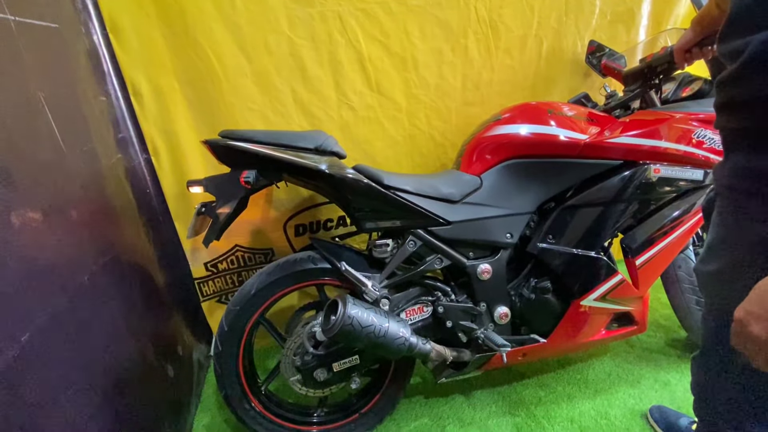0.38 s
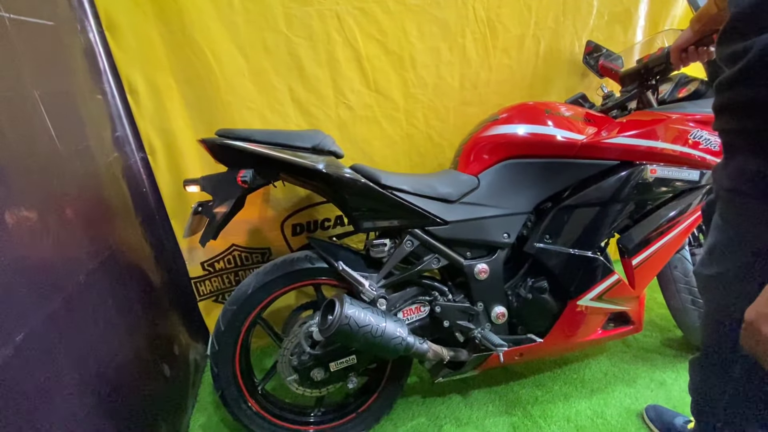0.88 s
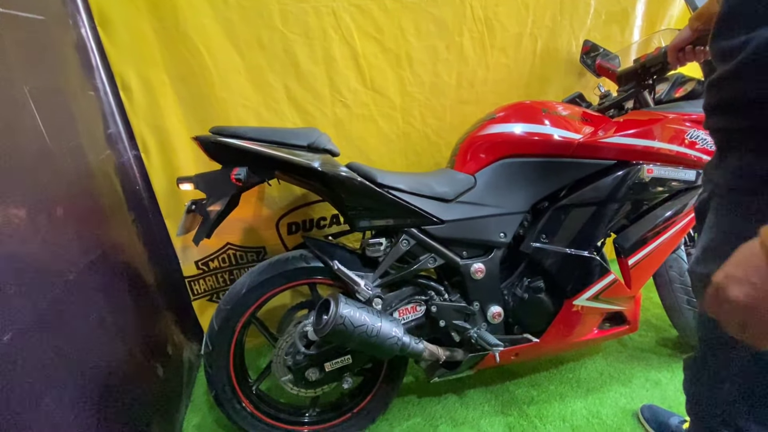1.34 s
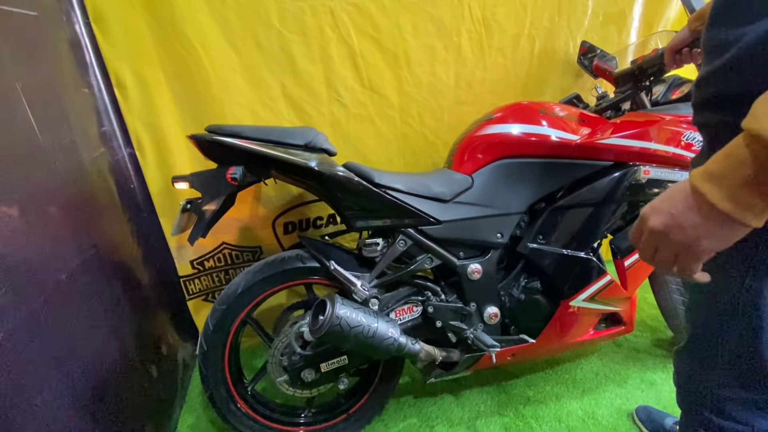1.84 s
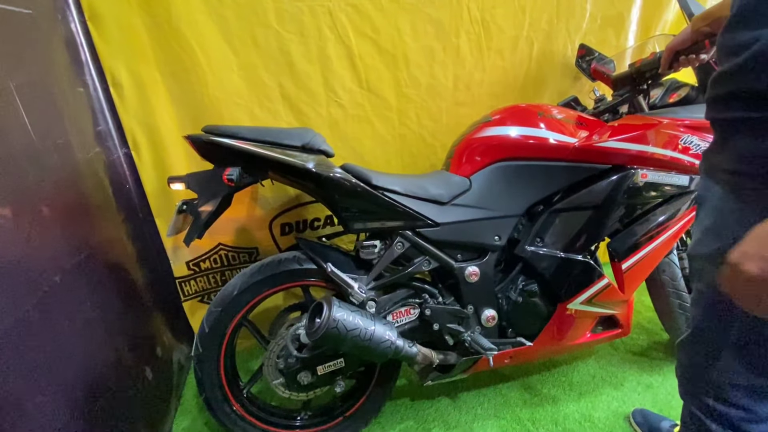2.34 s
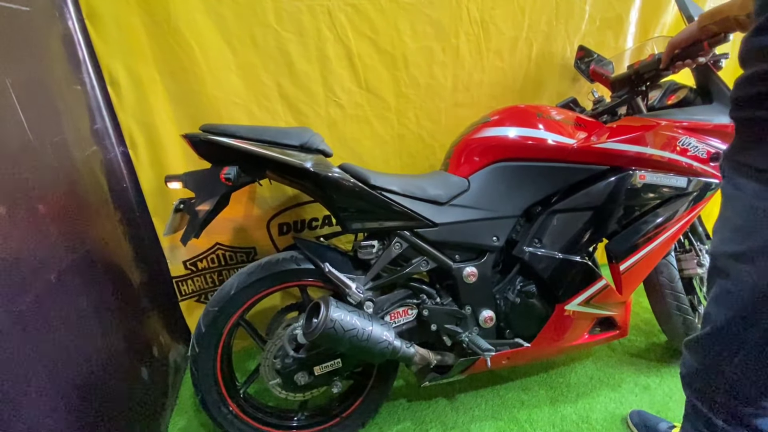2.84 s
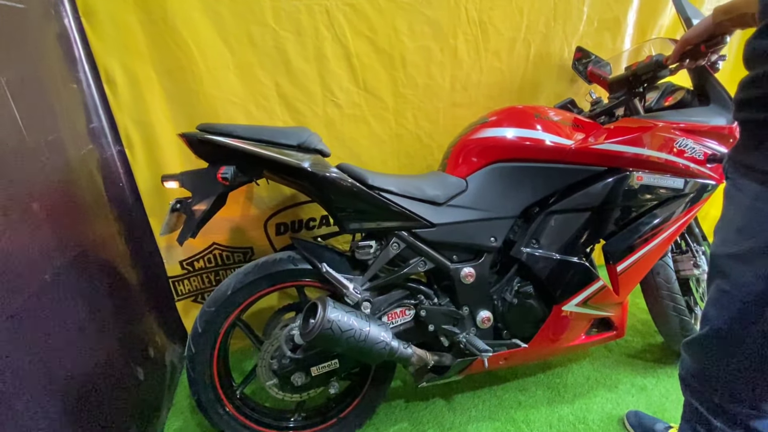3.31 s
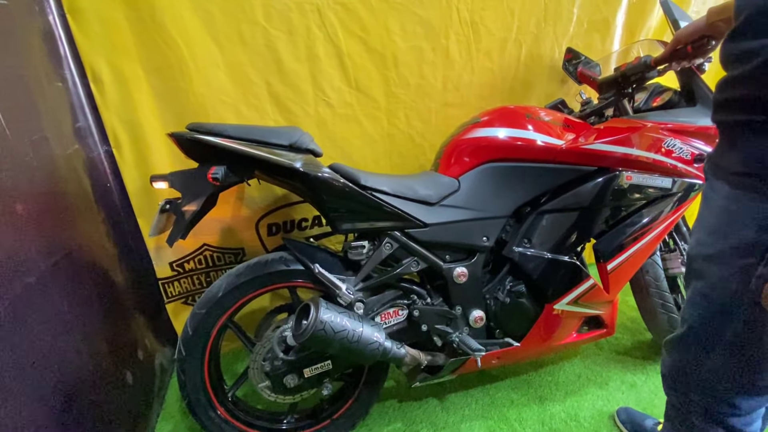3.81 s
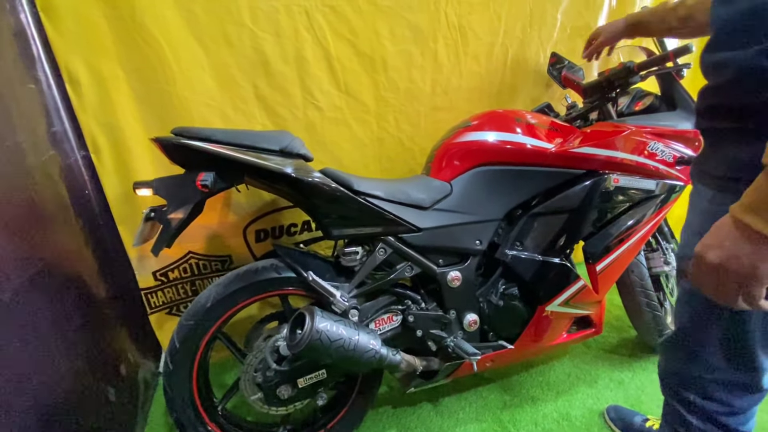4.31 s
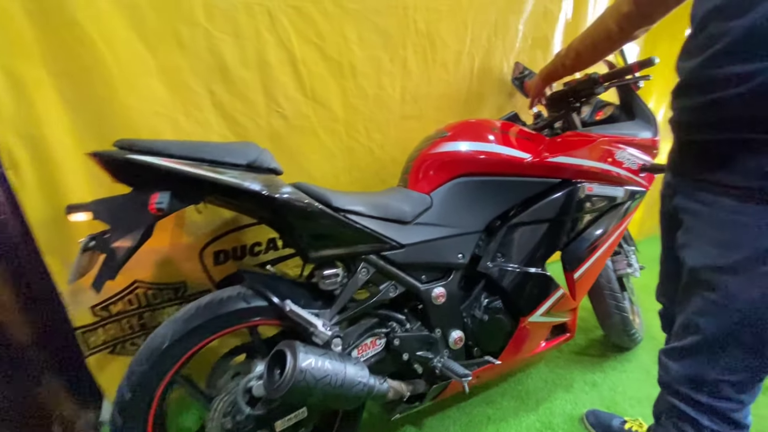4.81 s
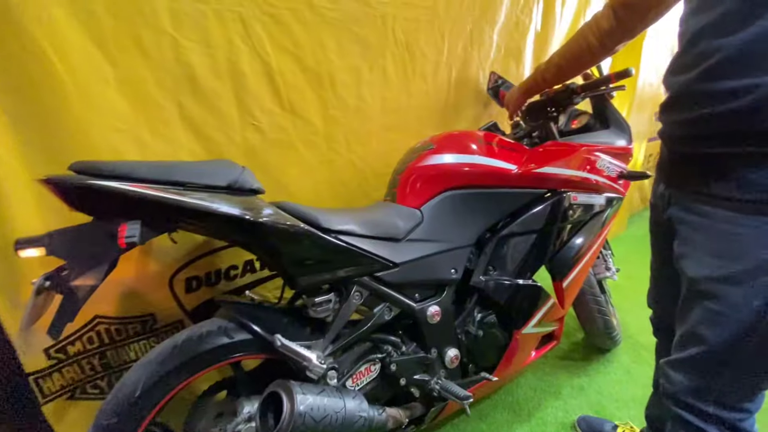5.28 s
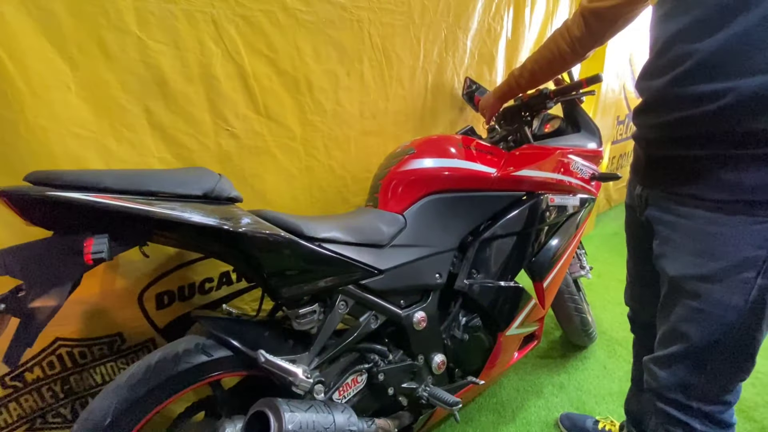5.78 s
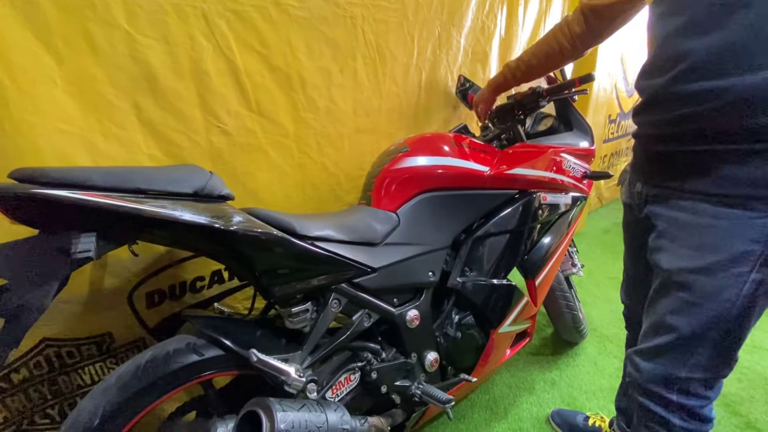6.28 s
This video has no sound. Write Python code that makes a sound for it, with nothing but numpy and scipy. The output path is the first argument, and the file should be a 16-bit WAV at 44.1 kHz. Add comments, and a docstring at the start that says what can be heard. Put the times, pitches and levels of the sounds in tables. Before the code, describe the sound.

In a small hard room, a motorbike's revs drop quickly into an uneven low idle with light valve rattle, before the engine is cut and a key clicks.

```python
"""A small four-stroke twin falls from a rev to a lumpy idle in a small hard room, then the ignition is cut.
Two firings a quarter cycle apart boom in the lowest room modes, throb in the silencer, bark in the pipe
and spit at the outlet. Noise through the engine cases makes the valve rattle; unburnt fuel pops, a few
firings start hard and a key clicks with a rattling tail, as short bursts ringing a body. Each microphone
gets its own wall answer and port."""
import sys
import numpy as np
from scipy import signal
from scipy.fft import rfft, irfft, next_fast_len
from scipy.io import wavfile
from scipy.ndimage import uniform_filter1d

SR = 44100
rng = np.random.default_rng(int(sys.argv[2]) if len(sys.argv) > 2 else 0)


def voltage_ratio(level):
    """Linear amplitude factor for a level in decibels (scalar or array-like)."""
    return 10 ** (np.asarray(level, float) / 20)


def master(y):
    """Save y as 16-bit WAV."""
    cut = np.clip(np.atleast_2d(y).T, -1, 1)
    pcm = np.round(cut * 32767)  # scale
    wavfile.write(sys.argv[1], SR, pcm.astype(np.int16))


N = 282240

# faint room air spectrum: freq_hz, relative_db
AIR = [(88, -26.5), (150, 6.5), (205, -8), (604, -50), (888, -25), (1030, -25), (2100, -40), (12000, -52.5),
       (15600, -99), (22000, -120)]
AIR_DB = -53
# reverberation: freq_hz, t60_s
REVERB = [(100, .7), (1000, .24), (4000, .075), (10000, .045)]
# wall sound against direct: freq_hz, level_db
WET = [(60, -32), (110, -21), (200, -15), (350, -13), (600, -19), (1100, -8), (2000, -6), (3500, 1),
       (6000, 6), (8000, 4), (10500, 1)]
# port gain, right and left microphone: freq_hz, gain_db
RIGHT_PORT = [(60, 4), (160, 8), (300, 4.5), (600, 12), (1000, 2.5), (2000, 9), (4500, -7.5), (10000, -10)]
LEFT_PORT = [(60, -4), (160, -9.5), (250, -6), (410, 4), (660, 11), (1060, 0.5), (2000, 4), (4500, -4.5),
             (10000, -10), (12300, -10.5)]
# phase lead of the left channel: freq_hz, lead_rad
LEFT_LEAD = [(0, -0.5), (200, -1.33), (300, -2.5), (520, -3.4), (1120, -3.5), (1640, -1.6), (2500, -.2),
             (2930, 2.5), (3700, 4.8), (4480, 6.7), (5000, 9.1), (5770, 10), (6200, 12.3), (6890, 12.7),
             (8500, 13)]
# microphones walk nearer to the cases: time_s, distance_m
DISTANCE = [(0, 1.63), (3.6, 1.72), (4.9, 1.31), (5.7, 1.22)]

# key click, a small one before it and its rattling tail: start_s, level_db
KEY = [(6.2854, -54.5), (6.3244, -41), (6.363, -52), (6.383, -49)]
# lock body: mode_hz, width_hz, level_db
LOCK = [(1300, 260, 11), (1810, 400, 10), (2530, 670, 6), (3100, 700, 9), (4400, 1500, 4),
        (7300, 3000, -18)]
# hard onsets of single firings: start_s, level_db
HARD_ONSETS = [(3.135, -40), (3.669, -41), (5.882, -39)]
# body of those firing onsets: mode_hz, width_hz, level_db
ONSET_RING = [(900, 590, 13), (2000, 900, -8), (4300, 1800, -12), (10000, 3000, -24)]
# afterfire pop: start_s, level_db before the silencer
POPS = [(.2745, -8.5), (.2825, -23)]
# pop body: mode_hz, width_hz, level_db
POP_RING = [(230, 120, 4), (600, 500, 9), (1060, 400, 12), (1450, 400, 11), (2150, 500, 8), (2650, 700, 3),
            (3700, 900, -9), (10100, 2300, -20)]
# silencer dulls the pop: mode_hz, width_hz, level_db
MUFFLE = [(1500, 2600, 1.5)]

# speed until the cut: time_s, cycles_per_s
SPEED = [(0.0, 61.8), (0.14, 55.04), (0.34, 46.42), (0.53, 41.4), (0.93, 34.5), (1.03, 33.2), (1.19, 30.4),
         (1.52, 26.7), (1.82, 23.6), (2.07, 20.4), (2.3, 17.5), (2.46, 16.54), (2.86, 15.96), (3.18, 15.87),
         (3.74, 14.82), (4.2, 14.32), (4.46, 14.72), (4.74, 13.9), (5.02, 14.66), (5.54, 13.9),
         (5.9, 14.43)]
# exhaust bands before the fade: time_s, boom_db, throb_db, bark_db
LEVELS = [(0.0, -26.5, -21.5, -28.5), (0.12, -21.5, -19.5, -35.5), (0.23, -37.5, -22.5, -34.5),
          (0.29, -27.5, -15.5, -37.5), (0.35, -23.5, -33.5, -37), (0.42, -24, -34.5, -40),
          (0.58, -38.5, -30.5, -36.5), (1.0, -34.5, -31, -36.5), (1.4, -32.5, -27.5, -39),
          (1.6, -26.5, -29.5, -43.5), (1.75, -26.5, -28, -40), (2.2, -24.5, -33, -44),
          (2.4, -21.5, -33, -42), (2.7, -17.5, -36.5, -45), (2.9, -17, -30, -48.5),
          (3.1, -21, -28.5, -48.5), (3.2, -22.5, -28.5, -48), (3.33, -23.5, -31, -45.5),
          (3.5, -36.5, -31, -44.5), (3.7, -26.5, -30.5, -49), (4.1, -22, -31.5, -49),
          (4.5, -23.5, -30.5, -49), (4.9, -20, -31.5, -43), (5.3, -19.5, -30, -43),
          (5.9, -19.5, -32.5, -42.5)]
# fade after the cut: boom_db_per_s, throb_db_per_s, bark_db_per_s
FADE_DB_PER_S = [21, 98.5, 143]
# uneven burning: time_s, amount_0_to_1
ROUGH = [(0, .12), (.25, .35), (.5, .2), (1.3, .3), (1.9, .5), (2.3, .35), (2.6, .08), (5.8, .14)]
# cycles burning unevenly on the overrun: time_s, against_neighbours_db
STRONG = [(.75, 3.5), (.786, 1.5), (.831, 3.5), (.894, 4.5), (.949, 4.5), (.985, 3.5), (1.098, 2), (1.3, 2),
          (1.338, 3), (1.374, 4.5), (1.412, 3), (1.445, 2), (1.484, -0.5), (1.518, 5), (1.556, 2),
          (1.592, 4), (1.636, 0), (1.674, 3), (1.727, 0.5), (1.84, -2), (1.891, -6), (1.931, 3.5),
          (2.119, 5), (2.173, 1.5), (2.227, 2)]
# idle strokes pushing air on a shut throttle, against a firing: time_s, boom_size_0_to_1, throb_size_0_to_1
PUMP = [(0, 0, 0.66), (.3, 0.1, 0.15), (.5, 0.2, 0.21), (1.2, 0, 0.39), (1.45, 0.43, 0.12),
        (1.7, 0.67, 0.24), (2.0, 0, 0.1), (2.25, 0.4, 0.16), (2.45, 0.05, 0.069), (3.5, 0.3, 0.021),
        (5.9, 0.07, 0.08)]
# lowest room modes: mode_hz, width_hz, level_db
BOOM = [(56.3, 2.82, 8), (62.4, 10.4, 4), (82.75, 6, 9.5), (108.5, 12.1, -3.5)]
# silencer resonances: mode_hz, width_hz, level_db
SILENCER = [(110.93, 5.4, -5), (122.8, 5.2, -3), (138, 2.6, -1.5), (172.9, 5.6, -9.5), (189.9, 21, -9.5),
            (205.8, 13, -5), (236.5, 8.3, -6), (234.5, 71, -7.5), (256.3, 5.5, 7.5)]
# exhaust pipe resonances: hot_mode_hz, cool_width_hz, cool_level_db, hot_level_db
PIPE = [(357.7, 8.9, 4, -6), (405.8, 29, 6, -4.5), (447, 30, -5, 2.5), (561, 46, 6, 2.5), (672, 24, -3, 0),
        (827.6, 43, 7.5, 6), (860, 70, 1.5, 1.5), (935, 87, -9, -4.5)]
# outlet rasp: mode_hz, width_hz, level_db
RASP = [(1038, 35, 6.5), (1350, 73, -18), (1870, 1700, -14)]
# engine case spectrum: freq_hz, relative_db
CASES = [(680, -8.5), (1150, -11.5), (1280, -12.5), (1570, -13.5), (1660, -10.5), (1840, -10.5),
         (2440, -14.5), (3040, -13.5), (3600, -14.5), (4200, -13), (4970, -11.5), (5500, -18.5),
         (5800, -14), (6150, -27), (6450, -16.5), (7600, -24.5), (8500, -20.5), (11000, -23), (18700, -120)]
# outlet jet spectrum: freq_hz, relative_db
JET = [(4590, -55), (7800, -32.5), (9290, -3), (10100, 8), (12200, 1.5), (12900, -22.5), (14800, -7.5),
       (15800, -21), (22000, -120)]
# level against speed: idle_db, gain_at_rev_db, steepness, loss_per_halving_under_idle_db
RATTLE_LAW = (-52.5, 19.5, 1.24, 12)
JET_LAW = (-60.5, 15, 3.5, 1.5)

IDLE_HZ, REV_HZ = 14.5, 60  # engine cycles at which the level laws are given
START_CYCLES, TWIN_CYCLES = .22, .25  # phase at 0 s, gap between the two firings
SHORTER_HEADER_S = .0007  # second cylinder arrives earlier
CUT_S, COAST_HZ_PER_S = 5.9, 27  # ignition off, crank slowing after it
COAST_DB, COAST_LOSS_DB_PER_S = -7, 40  # only pumped air after the cut, weakening
JET_CUT_DB = -14  # jet without burnt gas
BOOM_LEAD_S = .006  # boom starts at the valves, before gas has passed the silencer
BAFFLE_HZ = 309  # baffles stop the throb above this
COOL_HZ_RATIO, HOT_WIDTH_RATIO = 0.96, 1.5  # cool gas rings lower, fast hot gas rings wider


def unit(x):
    """Scale to rms 1."""
    return x / np.sqrt(np.mean(x ** 2) + 1e-20)


def even(x, span_s):
    """Divide by a running rms, smoothed twice over span_s."""
    size = int(span_s * SR)
    power = uniform_filter1d(x ** 2, size, mode="mirror")
    power = uniform_filter1d(power, size, mode="mirror")
    return x / np.sqrt(np.abs(power) + 1e-12)


def along(points, hz):
    """Interpolate (Hz, value) points on a log axis."""
    f, v = np.transpose(points)
    return np.interp(np.log(hz + 1), np.log(f + 1), v)


def curves(rows):
    """Interpolate each column after the time to one value per sample."""
    s, *cols = np.transpose(rows)
    return [np.interp(np.arange(N) / SR, s, c) for c in cols]


def filtered(x, response):
    """Apply a complex response of frequency."""
    m = next_fast_len(N + SR)
    return irfft(rfft(x, m) * response(np.fft.rfftfreq(m, 1 / SR)), m)[..., :N]


def resonant(x, modes, flip=-1):
    """Sum causal resonances, mode k weighted flip**k: 1 strikes in step, -1 alternates and swells."""
    def response(f):
        total = 0
        for k, (centre, width, db) in enumerate(modes):
            damping = 1j * f * width
            total = total + flip ** k * voltage_ratio(db) * damping / (centre * centre - f * f + damping)
        return total
    return filtered(x, response)


def softened(x, hz):
    """Three one-pole lowpasses: gas slugs have no sharp edge."""
    return filtered(x, lambda f: 1 / (1 + 1j * f / hz) ** 3)


def noise(spectrum):
    """Coloured noise of rms 1."""
    return unit(filtered(rng.standard_normal(N), lambda hz: voltage_ratio(along(spectrum, hz))))


def room_air():
    """Faint steady noise, independent in each channel."""
    return voltage_ratio(AIR_DB) * np.array([noise(AIR), noise(AIR)])


def room(x, count=40):
    """Diffuse wall answer per microphone, decaying noise crossfaded to new draws as they are carried about."""
    step = N // count
    out = np.zeros((2, N + 2 * SR))
    padded = np.pad(x, (step, 2 * step))
    window = np.sin(np.pi * np.arange(2 * step) / (2 * step)) ** 2
    for k in range(count + 1):
        hz, t, z = signal.stft(rng.standard_normal((2, SR // 2)), SR, nperseg=256)
        decay = voltage_ratio(-60 * t / along(REVERB, hz)[:, None])
        tail = signal.istft(z * decay, SR, nperseg=256)[1]
        tail = tail / np.linalg.norm(tail[0])
        piece = padded[k * step:][:2 * step] * window
        answer = signal.fftconvolve(piece[None], tail, axes=1)
        out[:, k * step + 250:][:, :answer.shape[1]] += answer  # 250 samples: walls answer late
    return filtered(out[:, step:][:, :N], lambda f: voltage_ratio(along(WET, f)))


def bursts(events, modes, decay_s, crack):
    """A one-sample crack and a decaying noise burst ring a body, scaled to the event's peak."""
    out, t = np.zeros(N + SR), np.arange(SR // 10) / SR
    for s, db in events:
        push = np.exp(-t / decay_s) * rng.standard_normal(len(t)) + crack * (t == 0)
        ring = resonant(np.pad(push, (0, N - len(t))), modes, flip=1)[:SR // 5]
        out[round(s * SR):][:len(ring)] += voltage_ratio(db) * ring / np.abs(ring).max()
    return out[:N]


def key_click():
    """A small click, the main one and its rattling tail ring the lock."""
    return bursts(KEY, LOCK, decay_s=0.023, crack=3.4)


def hard_onsets():
    """A few firings start hard: a crack and a short burst, ringing mostly low."""
    return bursts(HARD_ONSETS, ONSET_RING, decay_s=0.0067, crack=1.7)


def afterfire():
    """Unburnt fuel pops; the silencer dulls it."""
    return resonant(bursts(POPS, POP_RING, decay_s=0.0025, crack=4.8), MUFFLE)


def coasting_db(at):
    """Loss of a stroke at sample `at` once nothing burns."""
    return (at > CUT_S * SR) * (COAST_DB - COAST_LOSS_DB_PER_S * (at / SR - CUT_S))


def with_speed(speed, idle_db, rev_db, steepness, halving_db):
    """Level climbs with speed above idle and sinks as the crank coasts."""
    above = np.clip((speed - IDLE_HZ) / (REV_HZ - IDLE_HZ), 0, None)
    return idle_db + rev_db * above ** steepness + halving_db * np.log2(np.clip(speed / IDLE_HZ, None, 1))


def pumping(cycle):
    """Air pushes of the two strokes between the firings, as boom and throb get them."""
    out = np.zeros(N)
    strokes = np.arange(int(cycle[-1]))[:, None] + TWIN_CYCLES * np.arange(2, 4)
    at = np.interp(strokes, cycle, np.arange(N)).astype(int).ravel()
    np.add.at(out, at, voltage_ratio(coasting_db(at)))
    return out * np.clip(curves(PUMP), 0, 1)


def firings(cycle, spread_db, jitter_cycles):
    """One impulse per blowdown, a row per cylinder; lean running scatters size and timing."""
    out, rough = np.zeros((2, N)), curves(ROUGH)[0]
    turns = np.arange(int(cycle[-1]))
    luck = rng.standard_normal((len(turns), 4))
    extra_db = np.zeros(len(turns))
    for s, db in STRONG:
        extra_db[round(cycle[round(s * SR)])] = db
    for k in range(2):
        due = turns + k * TWIN_CYCLES
        at = np.interp(due, cycle, np.arange(N)).astype(int)
        scattered = due + jitter_cycles * rough[at] * luck[:, k + 2]
        arrival = np.interp(scattered, cycle, np.arange(N)) - k * SHORTER_HEADER_S * SR
        size_db = extra_db + spread_db * rough[at] * luck[:, k] + coasting_db(at)
        np.add.at(out[k], np.maximum(arrival, 0).astype(int), voltage_ratio(size_db))
    return out


def puffs(pulses, decay_s):
    """Gas flow after each blowdown: sudden start, exponential end."""
    return unit(signal.lfilter([1], [1, -np.exp(-1 / (decay_s * SR))], pulses))


def outlet_jet(pulses, flow):
    """Broadband hiss swelling with each gas puff."""
    spit = softened(puffs(pulses, decay_s=0.002), hz=300)
    return even(noise(JET) * (.5 + 1.2 * spit + 0.81 * flow), span_s=0.086)


def outlet_rasp(turbulence):
    """Turbulent gas rings the outlet."""
    rasp = resonant(turbulence + rng.standard_normal(N), RASP)
    return unit(resonant(rasp, [(1520, 1300, 0)]))


def valve_rattle(flow, turbulence, bright):
    """Case noise swells with the firings; outlet rasp joins it at speed."""
    cases = noise(CASES) * (0.74 + 0.5 * flow)
    return even(cases + 1.22 * bright * outlet_rasp(turbulence), span_s=0.56)


def pipe_bark(pulses, turbulence, speed, bright):
    """Pulses ring the pipe, whose resonances shift as it cools with falling speed."""
    gas = unit(pulses) + .15 * turbulence + .025 * rng.standard_normal(N)
    hot = resonant(gas, [(hz, w * HOT_WIDTH_RATIO, db) for hz, w, _, db in PIPE], flip=0.93)
    cool = resonant(gas, [(hz * COOL_HZ_RATIO, w, db) for hz, w, db, _ in PIPE], flip=0.82)
    heat = np.clip((speed - IDLE_HZ) / 22, 0, 1)
    ring = resonant(heat * hot + (1 - heat) * cool, [(532, 450, 0)])
    return even(softened(ring, hz=403) + bright * softened(ring, hz=2250), span_s=0.59)


def silencer_throb(first, second, pumped, turbulence, speed):
    """Gas slugs pass the baffles and ring the silencer, lower in cooler gas."""
    slugs = -unit(.6 * first + second + pumped) + .07 * turbulence + .02 * rng.standard_normal(N)
    slugs = filtered(slugs, lambda f: 1 / (1 - (f / BAFFLE_HZ) ** 2 + 1.1j * f / BAFFLE_HZ) ** 3)
    box = resonant(slugs, SILENCER, flip=0.84)
    warm = resonant(box, [(105, 12, -7), (203.3, 111, -1.3)], flip=0.71)
    cool = resonant(box, [(105, 12, -7), (179.3, 64, 0.96)], flip=0.71)
    heat = np.clip((speed - IDLE_HZ) / 3, 0, 1)
    return even(softened(heat * warm + (1 - heat) * cool, hz=920), span_s=0.12)


def room_boom(pushes):
    """Firings and air pushes drive the lowest room modes; little radiates under the first."""
    def radiation(f):
        ratio = f / 53
        highpass = (ratio ** 2 / (1 - ratio ** 2 + 0.6j * ratio)) ** 2
        return highpass * np.exp(2j * np.pi * f * BOOM_LEAD_S)
    return even(softened(filtered(resonant(pushes, BOOM), radiation), hz=390), span_s=0.19)


def engine():
    """The same firings drive boom, throb, bark and jet; the cases rattle along."""
    off_s = np.maximum(np.arange(N) / SR - CUT_S, 0)
    speed = np.maximum(curves(SPEED)[0] - COAST_HZ_PER_S * off_s, 1)
    cycle = START_CYCLES + np.cumsum(speed) / SR
    first, second = firings(cycle, spread_db=5, jitter_cycles=.015)
    pulses = first + voltage_ratio(-1.5) * second
    pumped_boom, pumped_throb = pumping(cycle)
    flow = softened(puffs(np.sqrt(pulses), decay_s=.008), hz=400)
    turbulence = flow * rng.standard_normal(N)
    bright = np.clip(speed / 40, 0, 1) ** 1.97  # faster gas steepens the pulse

    boom_db, throb_db, bark_db = curves(LEVELS) - np.outer(FADE_DB_PER_S, off_s)
    near_db = 20 * np.log10(DISTANCE[0][1] / curves(DISTANCE)[0])
    rattle_db = with_speed(speed, *RATTLE_LAW) + near_db
    jet_db = with_speed(speed, *JET_LAW) + JET_CUT_DB * (off_s > 0)

    out = voltage_ratio(boom_db) * room_boom(pulses + pumped_boom)
    out += voltage_ratio(throb_db) * silencer_throb(first, second, pumped_throb, turbulence, speed)
    out += voltage_ratio(bark_db) * pipe_bark(pulses, turbulence, speed, bright)
    out += voltage_ratio(rattle_db) * valve_rattle(flow, turbulence, bright)
    return out + voltage_ratio(jet_db) * outlet_jet(pulses, flow)


def scene():
    """Engine, pop, hard onsets and key in the room, over faint air noise."""
    motor = engine()
    sharp = afterfire() + key_click() + hard_onsets()
    walls = room(motor + 0.81 * sharp)
    # direct engine and walls share the engine's power; direct sharp sounds stay whole
    shared = filtered(motor + walls, lambda f: 1 / np.sqrt(1 + voltage_ratio(2 * along(WET, f))))
    return sharp + shared + room_air()


def roll_off(x):
    """The treble ends steeply here."""
    return signal.sosfilt(signal.butter(12, 12300, fs=SR, output="sos"), x)


def record(dry):
    """Unlike ports colour the two channels and shift the left in phase."""
    def ports(hz):
        lead_rad = np.interp(hz, *np.transpose(LEFT_LEAD))
        left = voltage_ratio(along(LEFT_PORT, hz)) * np.exp(1j * lead_rad)
        return np.array([left, voltage_ratio(along(RIGHT_PORT, hz))])
    return roll_off(filtered(dry, ports))


dry = scene()
out = record(dry)
master(out)
```